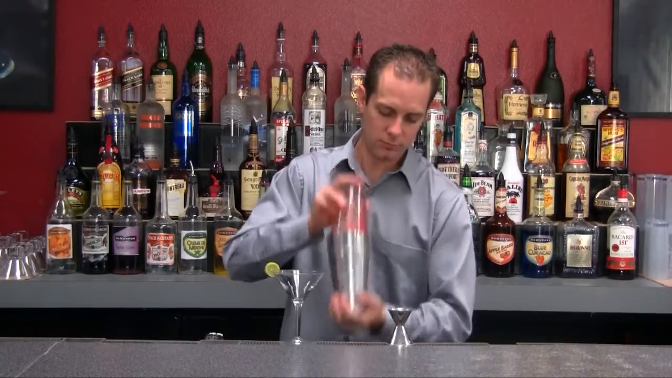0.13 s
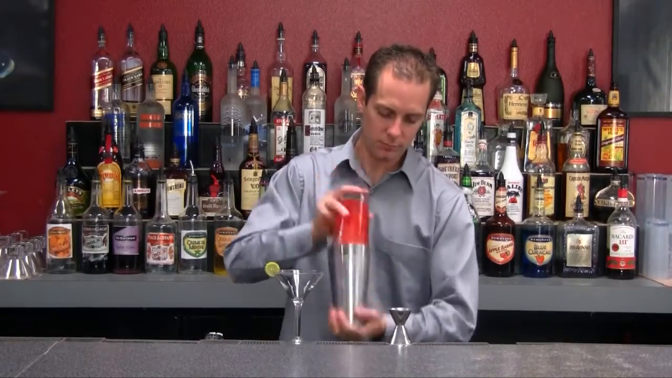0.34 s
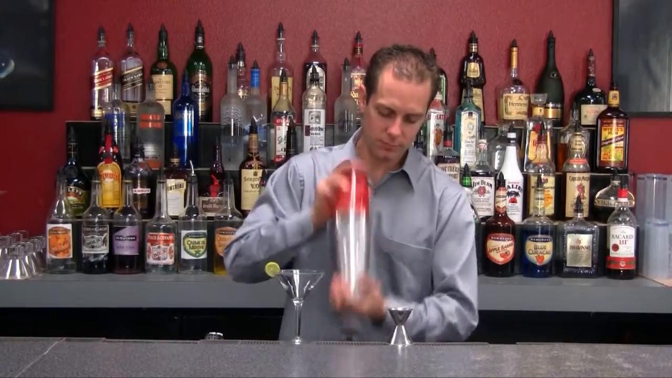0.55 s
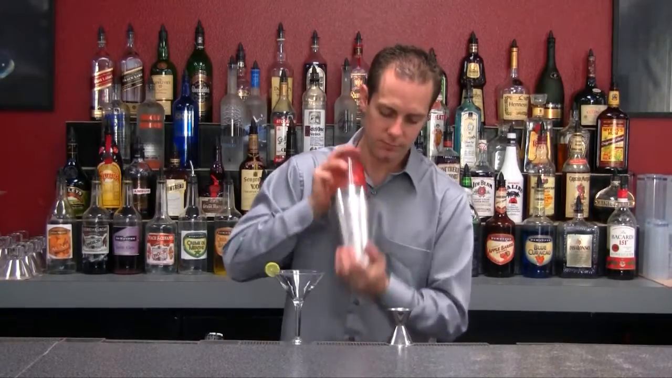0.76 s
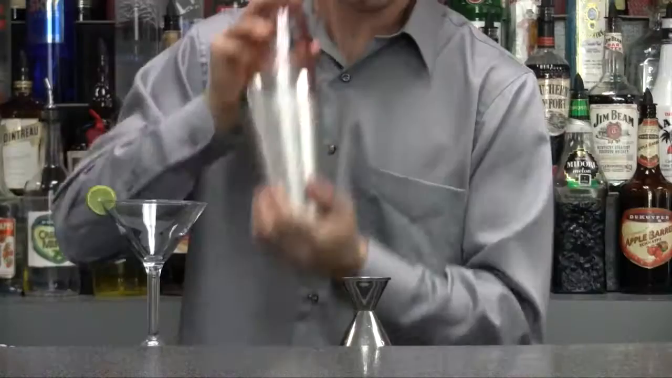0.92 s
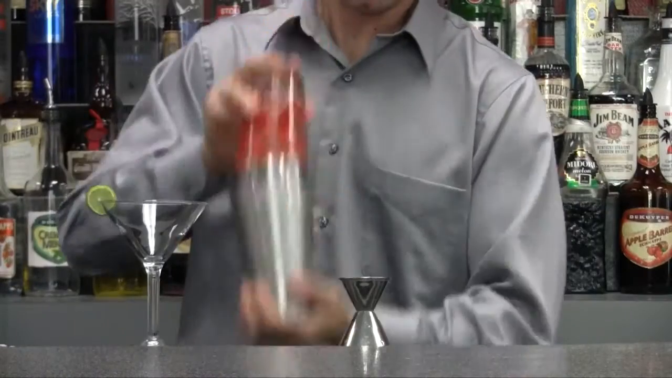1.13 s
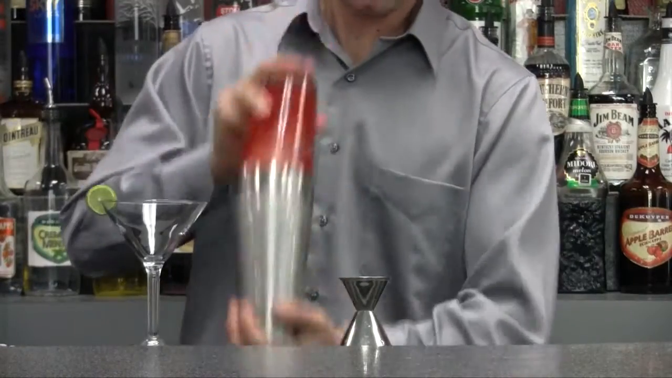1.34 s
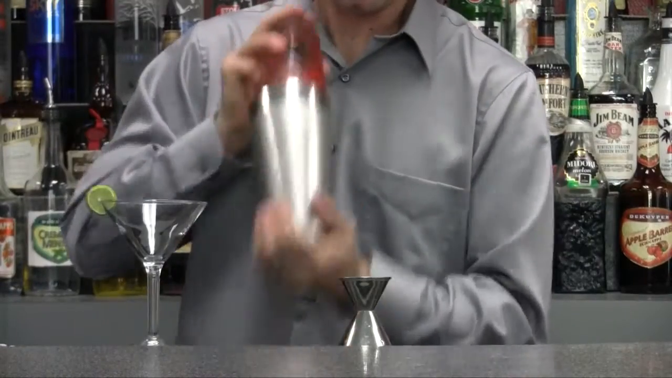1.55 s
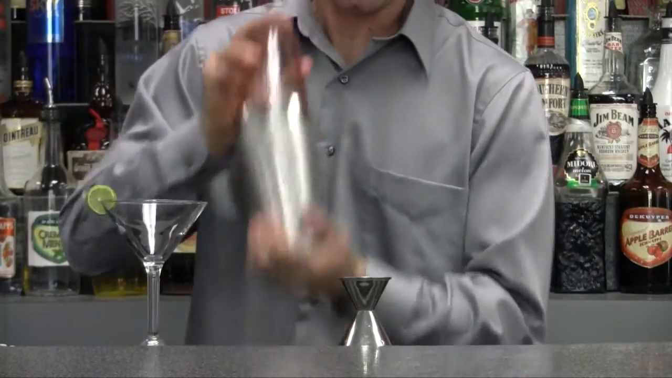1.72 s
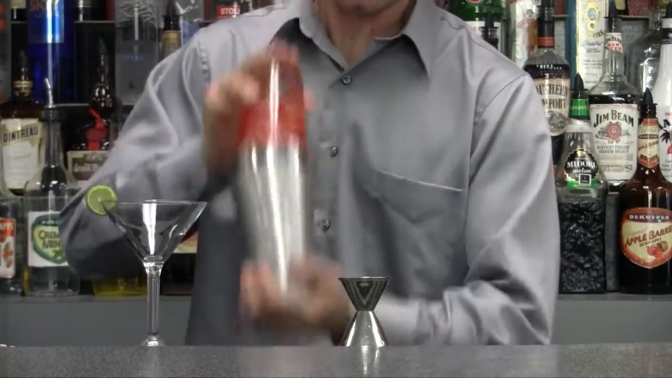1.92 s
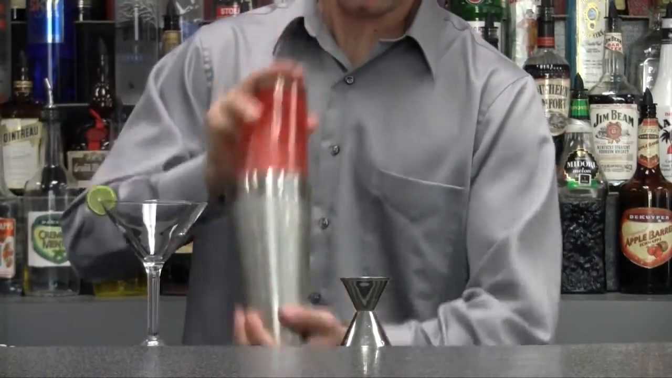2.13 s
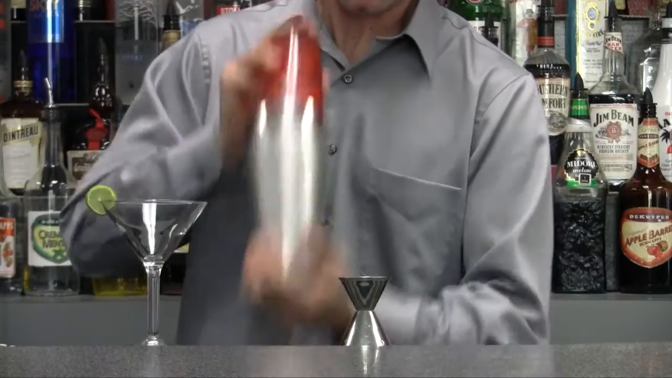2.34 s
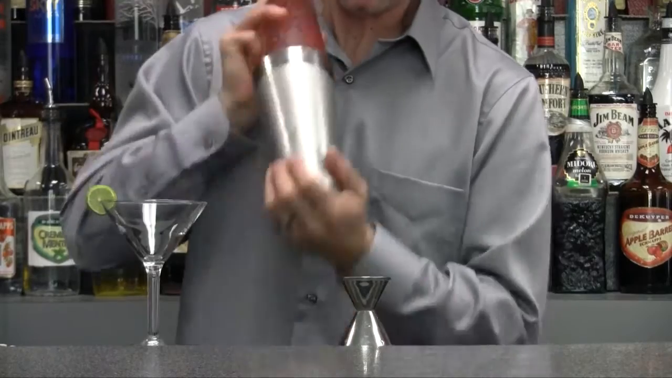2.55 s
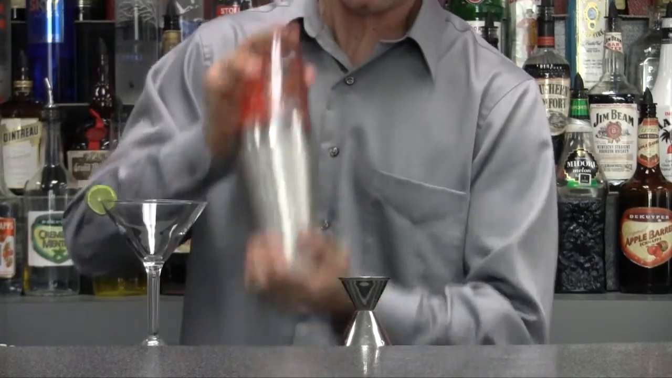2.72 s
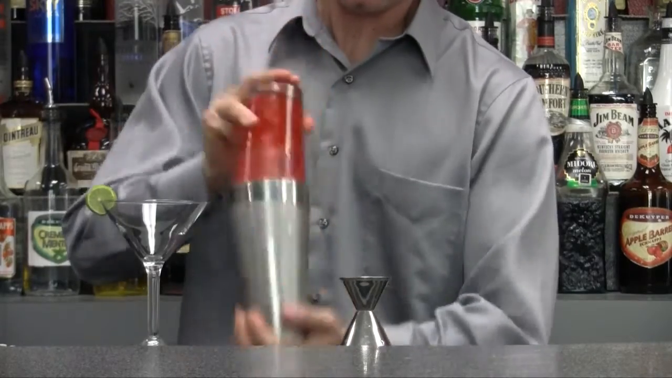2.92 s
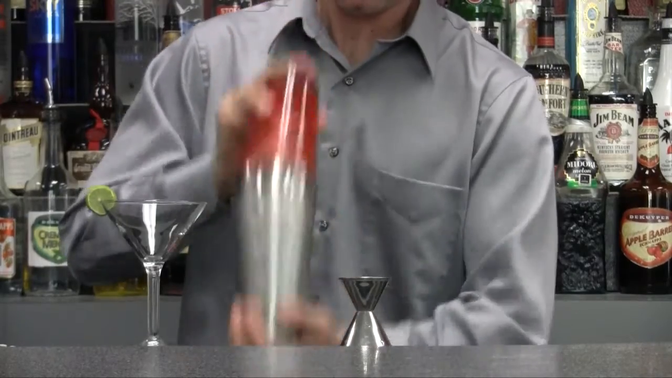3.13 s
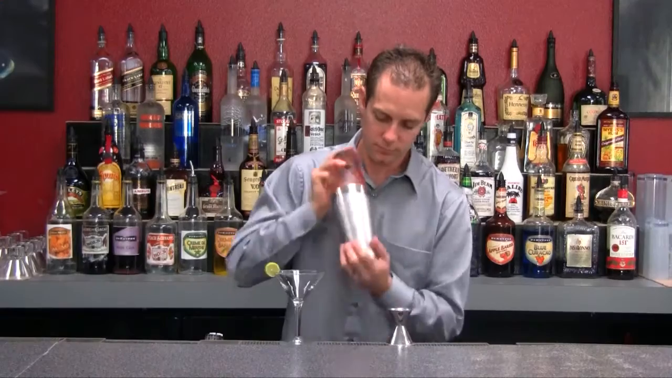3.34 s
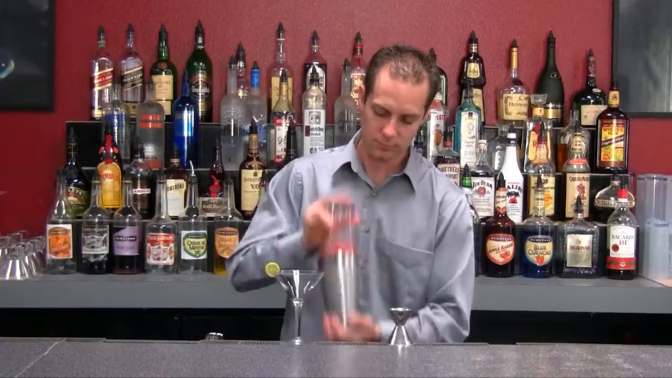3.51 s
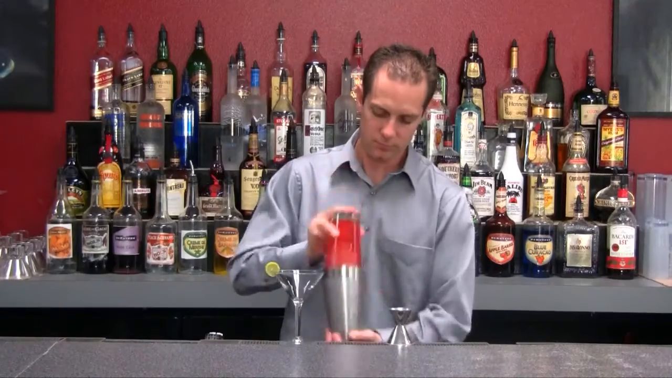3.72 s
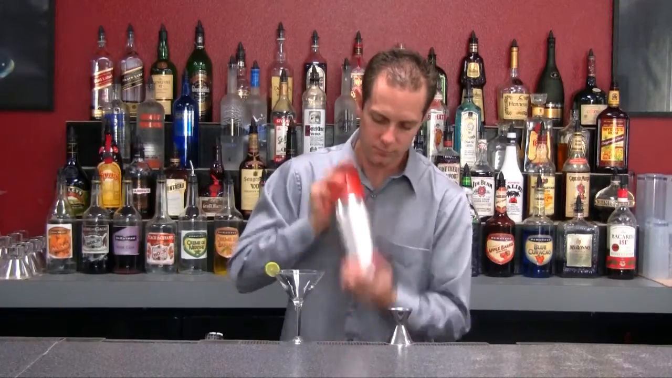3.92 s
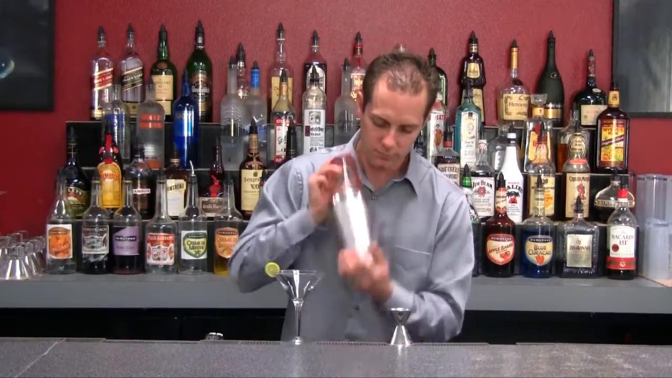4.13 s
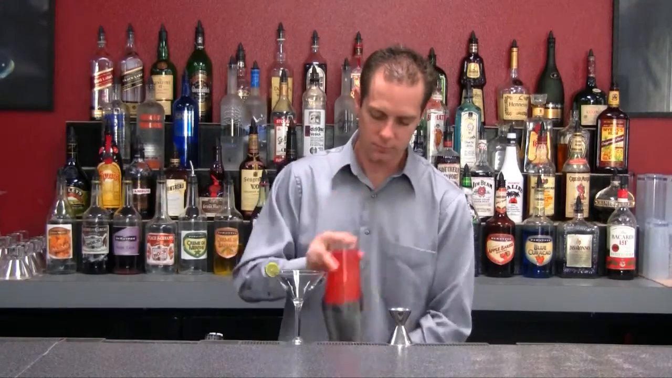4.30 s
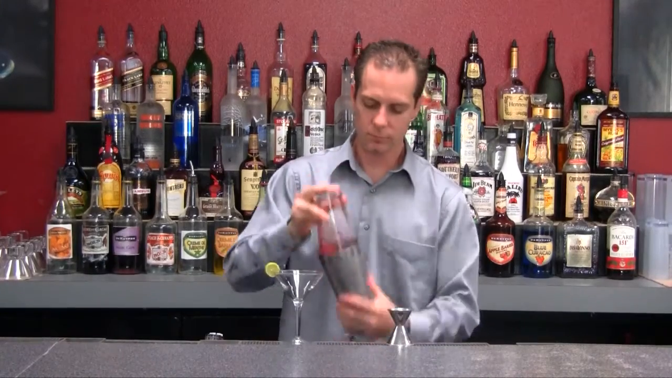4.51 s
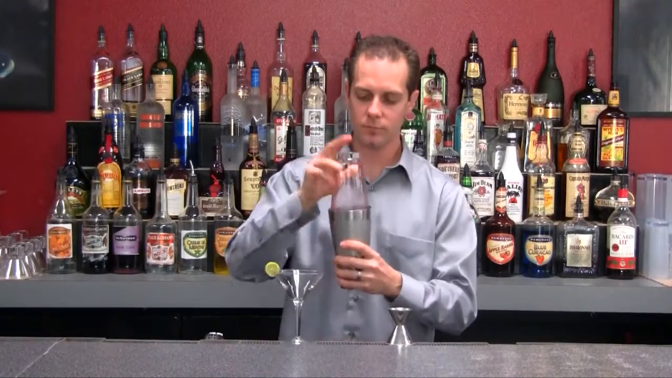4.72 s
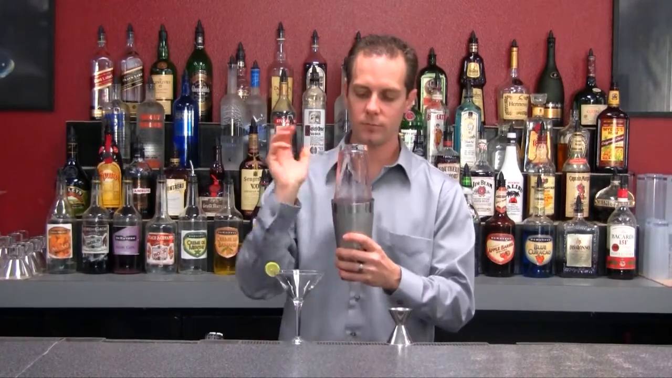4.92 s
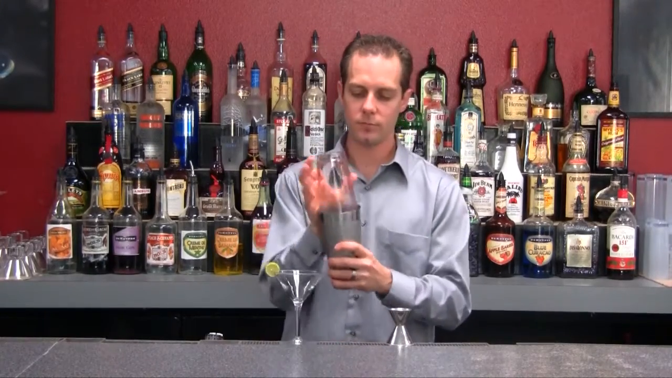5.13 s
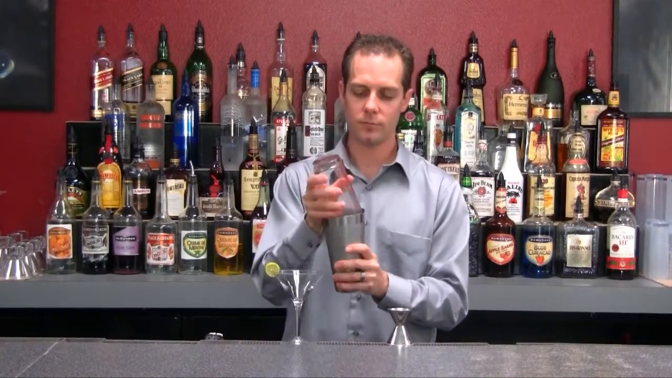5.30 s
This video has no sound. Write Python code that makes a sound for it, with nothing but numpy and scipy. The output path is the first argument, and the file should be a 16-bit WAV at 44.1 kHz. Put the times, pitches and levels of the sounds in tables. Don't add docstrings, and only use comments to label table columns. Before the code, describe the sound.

Vigorous cocktail shaking, bright clattering ice about eight strokes a second, stops abruptly; ice settles and a palm knocks the tin.

```python
import sys
import numpy as np
from scipy import signal
from scipy.io import wavfile
from scipy.ndimage import uniform_filter1d

SR = 44100
rng = np.random.default_rng(int(sys.argv[2]) if len(sys.argv) > 2 else 0)


def ratio(d):
    e = np.asarray(d, float) / 20
    return 10 ** e


def inscribe(sig):
    pcm = np.round(np.clip(np.atleast_2d(sig).T, -1, 1) * 32767)
    wavfile.write(sys.argv[1], SR, pcm.astype(np.int16))


N = 236400

# start_s [s], level_db [dB], rise_s [s], fall_s [s], glass_ring_db [dB]
DOWN = [(0.166, -18, 0.026, 0.051, -24.5), (0.421, -17, 0.035, 0.051, -17),
        (0.673, -16.5, 0.031, 0.057, -22), (0.937, -17.5, 0.0055, 0.097, -20),
        (1.189, -17.5, 0.045, 0.042, -21.5), (1.447, -19, 0.049, 0.074, -26),
        (1.737, -16, 0.031, 0.047, -20), (1.984, -16, 0.043, 0.012, -24.5), (2.239, -17, 0.031, 0.069, -20),
        (2.499, -17, 0.038, 0.05, -16.5), (2.722, -17, 0.074, 0.052, -22), (2.996, -19, 0.049, 0.094, -24),
        (3.262, -18.5, 0.035, 0.067, -23), (3.52, -17, 0.037, 0.057, -22.5),
        (3.8, -17.5, 0.029, 0.068, -30.5), (4.085, -16, 0.028, 0.035, -23.5),
        (4.375, -17.5, 0.035, 0.06, -25)]


def evened(x):
    return x / np.sqrt(np.mean(x ** 2) + 1e-20)


def read(points, hz):
    f, value = np.transpose(points)
    return np.interp(np.log(hz + 1), np.log(f + 1), value)


def add(mix, s, sound):
    part = mix[int(round(s * SR)):][:len(sound)]
    part += sound[:len(part)]


def ring(hz, cycles, rise):
    turns = np.arange(1400)[:, None] / SR * np.atleast_1d(hz)
    return (1 - np.exp(-turns / rise)) * np.exp(-turns / cycles) * np.sin(2 * np.pi * turns)


def tumbling(per_s, fall_s, share):
    starts = np.minimum(rng.exponential(1, N), 2.5) * (rng.random(N) < per_s / SR)
    keep = np.exp(-1 / (fall_s * SR))
    flurries = signal.lfilter([1], [1, -keep], starts)
    return np.sqrt(1 - share + share * flurries / flurries.mean())


def grains(modes, per_s, spread_db, cycles, detune):
    visits = [tumbling(40, 0.012, 0.4) for _ in modes]
    modes = np.tile(modes, (3, 1))
    size = ratio(spread_db * np.minimum(rng.exponential(1, N), 5)) * (rng.random(N) < per_s / SR)
    size *= rng.choice([-1, 1], N)
    patch = rng.integers(0, len(modes), N)
    pitches = modes[:, 0] * (1 + detune * rng.uniform(-1.12, 1, len(modes)))
    rings = ring(pitches, cycles, 0.35) * ratio(modes[:, 1])
    out = np.zeros(N)
    for k in range(len(modes)):
        hits = size * (patch == k) * visits[k % len(visits)]
        out += signal.oaconvolve(hits, rings[:, k])[:N]
    return evened(out)


def strikes(rows, cycles, tick_db, body_db, rebound_s, scatter, lead_db, count=16):
    out, luck = np.zeros(N), rng.random((len(rows), count, 3))
    for (s, peak_db, hz, rebound_db), (when, size, pitch) in zip(rows, luck.transpose(0, 2, 1)):
        first = ring(hz, cycles, 0.93)[:, 0]
        first = first / first.max()
        first += ratio(tick_db) * ring(hz * (1.5 + pitch[:3]), 2.8, 0.87).sum(1)
        first += ratio(body_db) * ring(hz * (0.2 + 0.4 * pitch[:2]), 0.96, 0.84).sum(1)
        add(out, s, ratio(peak_db + lead_db) * first)
        later = ring(hz * np.exp(scatter * (2 * pitch - 1)), cycles, 0.23)
        for k, turn in enumerate(3 * when):
            level = ratio(peak_db + rebound_db + lead_db / 2 - 6.1 * size[k]) * np.exp(-turn)
            add(out, s + 0.001509 + turn * rebound_s, level * later[:, k])
    return out


def hum():
    # pitch_hz [Hz], level_db [dB per Hz]
    noise_colour = [(15, -55), (25, -33.5), (80, -18), (96, -15.5), (127, -9), (161, -10), (185, -20),
                    (330, -12.5), (480, -23.5), (2100, -29), (3850, -29), (8000, -37.5), (12000, -52.5)]
    # pitch_hz [Hz], level_db [dB]
    motor_tones = [(152, -62), (240, -64), (360, -66.5)]
    frames, hz = N // 512 + 5, np.fft.rfftfreq(2048, 1 / SR)
    a, b, patches = rng.standard_normal((frames, 1025, 3)).T
    patches = evened(uniform_filter1d(uniform_filter1d(patches, 6, 0), 8, 1))
    spectrum = (a + 1j * b) * ratio(read(noise_colour, hz)[:, None] + 1.2 * patches)
    noise = signal.istft(spectrum, nperseg=2048, noverlap=1536)[1][:N]
    out = ratio(-54.5) * evened(noise)
    for f, db in motor_tones:
        out += ratio(db) * np.sin(2 * np.pi * f * np.arange(N) / SR)
    return out


def room(x, count=9):
    # pitch_hz [Hz], t60_s [s]
    die_away = [(150, 0.18), (260, 0.25), (500, 0.5), (1500, 0.21), (3500, 0.47), (7000, 0.31),
                (12000, 0.63)]
    taps = np.zeros((count, SR // 2))
    spacing = np.arange(130, SR // 2 - 20, 20)
    at = spacing + rng.integers(0, 20, (count, (SR // 2 - 131) // 20))
    np.put_along_axis(taps, at, rng.choice([-1., 1.], at.shape), 1)
    hz, t, z = signal.stft(taps, SR, nperseg=256)
    tails = signal.istft(z * ratio(-60 * t / read(die_away, hz)[:, None]), SR, nperseg=256)[1]
    tails = tails / np.linalg.norm(tails[0])
    place = (np.arange(N) / SR * 23 - np.arange(count)[:, None]) % count
    share = np.sin(np.pi * np.minimum(place, 2) / 2)
    return signal.fftconvolve(x * share, tails, axes=1)[:, :N].sum(0)


def hand():
    # start_s [s], level_db [dB], pitch_hz [Hz], t60_s [s]
    thuds = [
        (5.129, -10, 270, 0.029),
        (5.137, -27, 126, 0.05),
        (4.7, -35, 320, .05),
        (5.343, -38, 270, .06),
        (5.35, -42, 110, .05),
        (5.129, -25, 510, 0.045),
        (5.132, -23.5, 1000, 0.043),
        (6.9, -32, 670, 0.054),
        (2.27, -28, 290, .06),
        (3.82, -32, 300, 0.05),
    ]
    out, t = np.zeros(N), np.arange(6000) / SR
    for s, peak_db, hz, t60 in thuds:
        add(out, s, ratio(peak_db - 60 * t / t60) * np.sin(2 * np.pi * hz * t) * (1 - np.exp(-t / 0.002)))
    return signal.sosfilt(signal.butter(2, 45, "highpass", fs=SR, output="sos"), out)


def knock():
    # start_s [s], level_db [dB], pitch_hz [Hz], rebound_db [dB]
    hits = [
        (4.571, -20, 5600, 7.5),
        (4.678, -30, 5200, 4),
        (4.734, -37, 1710, -4),
        (4.785, -38, 2500, -8),
        (5.131, -15.5, 1550, -10),
        (5.1305, -19, 3770, 6),
        (5.133, -14, 4240, 0),
        (5.1335, -17.5, 6200, 4),
        (5.314, -37, 1300, -8),
        (5.355, -25, 3510, 11),
    ]
    return strikes(hits, 2.7, -15, -11.5, 0.0084, 0.13, -0.32)


def slaps():
    # start_s [s], level_db [dB], pitch_hz [Hz]
    slap_times = [(0.072, -23.5, 680), (0.175, -26.5, 517), (0.304, -23, 746), (0.351, -23.5, 627),
                  (0.445, -16, 975), (0.764, -24, 668), (0.915, -24, 1050), (1.088, -28, 654),
                  (1.492, -23.5, 650), (1.741, -28.5, 503), (1.878, -24.5, 686), (1.998, -27, 926),
                  (2.251, -29, 1040), (2.408, -21.5, 662), (2.646, -20.5, 740), (2.783, -28, 778),
                  (3.022, -22.5, 580), (3.262, -23.5, 553), (3.803, -31, 990), (3.962, -25, 750),
                  (4.074, -24.5, 600)]
    out = np.zeros(N)
    for s, peak_db, hz in slap_times:
        air = ring(hz, 3.9, 1.27)[:, 0] / 0.51
        gulp = ratio(-3) * ring(0.55 * hz, 2.28, 0.8)[:, 0]
        add(out, s, ratio(peak_db - 3.0) * (air + gulp))
    return out


def glass():
    late_s, swell_db_per_s, fade_db_per_s = 0.013, 119, 260
    rows = np.array(DOWN)
    since = np.arange(N) / SR - rows[:, :1] - late_s
    level_db = rows[:, -1:] + np.minimum(swell_db_per_s * since, -fade_db_per_s * since)
    singing = grains([(1530, -2), (1610, 0.67)], 1200, 1.9, 11.0, 0.028)
    return ratio(level_db.max(0) - 7.5) * tumbling(30, 0.013, 0.36) * singing


def ticks():
    # start_s [s], level_db [dB]
    tick_times = [(0.331, -3), (0.5305, -12), (0.6264, -16), (0.6893, -6), (0.708, -12), (0.8446, -13),
                  (1.1, -10.5), (1.348, -19), (1.6724, -12), (1.797, -6), (1.8754, 2.5), (1.936, -11),
                  (2.0087, -11), (2.078, -4), (2.1148, -18), (2.4238, 1), (2.449, -3.5), (2.646, 1),
                  (2.8788, -6), (3.429, -15), (3.458, 1), (3.4678, -17.5), (3.6595, -4.5), (3.964, -1),
                  (3.996, -8), (4.0214, 1.5), (4.25, -2), (4.265, 3), (4.676, -23), (4.7345, -22)]
    # pitch_hz [Hz], level_db [dB]
    tick_colour = [(1300, -2), (2500, 7.5), (4200, -4), (6300, 10), (8500, -15)]
    out, (hz, db) = np.zeros(N), np.transpose(tick_colour)
    luck = rng.uniform(-1.2, 1, (len(tick_times), 2, len(tick_colour)))
    for (s, peak_db), (pitch, level) in zip(tick_times, luck):
        click = ring(hz * (1 + 0.27 * pitch), 2.8, 0.31) @ ratio(db + 1.8 * level)
        add(out, s, ratio(peak_db) * click / abs(click).max())
    return out


def clacks():
    # start_s [s], level_db [dB], pitch_hz [Hz]
    early_cubes = [(0.0984, -15, 3010), (0.1654, -9, 4780), (0.1725, -7.5, 2760), (0.1799, -5, 4620),
                   (0.2, -3, 4850), (0.334, -11, 3140), (0.3726, 0, 5040), (0.4253, -10, 2600),
                   (0.4388, -12, 3000), (0.5308, 0, 5560), (0.583, -11, 5300), (0.5965, -5, 5600),
                   (0.603, -2, 5700), (0.6276, -11, 3300), (0.672, -8.5, 5860), (0.6762, -3, 5990),
                   (0.6891, -5, 2740), (0.6973, 2, 2920), (0.7082, -5, 2890), (0.822, -21, 3010),
                   (0.8469, -6.5, 3020), (0.8744, -5, 5500), (0.9007, -14, 5340), (0.9122, -6.5, 1580),
                   (0.9434, -1.5, 2790), (0.9509, -5.5, 2170), (0.9817, -7.5, 4610), (1.0366, -12, 5340),
                   (1.0451, -14.5, 3790), (1.0554, -9, 4520), (1.0959, -12, 5900), (1.1023, -6, 5800),
                   (1.1891, -11.5, 3080), (1.1971, -9.5, 1500), (1.2082, -9.5, 2450), (1.2174, -7.5, 2730),
                   (1.2378, -11, 1610), (1.3004, -7, 4570), (1.3503, -2.5, 5860), (1.4521, -12.5, 1610),
                   (1.4564, -3, 5640), (1.461, -5, 3940), (1.4921, 0, 2710), (1.6493, -20, 2600),
                   (1.662, -11, 2970), (1.6732, -9, 3100), (1.6826, -9, 3180), (1.7541, -5.5, 1590),
                   (1.7583, -15, 1790), (1.7943, -17, 1600), (1.909, -11, 3020), (1.9341, -1.5, 5680),
                   (2.0102, -5.5, 2800), (2.054, -5, 3730), (2.1629, -12, 4690)]
    # start_s [s], level_db [dB], pitch_hz [Hz]
    late_cubes = [(2.1769, -16, 3300), (2.1873, -10, 2950), (2.2473, -13, 1600), (2.2832, -6, 1720),
                  (2.2885, -18.5, 1790), (2.4077, -10.5, 2320), (2.4243, -11, 4910), (2.4496, -4, 4660),
                  (2.4745, -13, 1590), (2.525, 4, 2660), (2.5426, -11.5, 2560), (2.5832, -15, 2580),
                  (2.6154, -8, 5680), (2.707, -16, 1640), (2.7253, 0, 2650), (2.7321, -12, 2000),
                  (2.7433, -8, 2310), (2.7633, -6, 1650), (2.7744, -4.5, 2510), (2.9604, -12, 3080),
                  (2.9985, -15, 1660), (3.0343, -11, 4310), (3.0385, -5, 4570), (3.0891, -15, 2150),
                  (3.1367, -15, 4180), (3.1518, -9, 4050), (3.1783, -11, 4670), (3.2652, -8, 2460),
                  (3.2739, 2.5, 2450), (3.2842, -11, 2430), (3.2904, 0, 2560), (3.4311, -15, 3900),
                  (3.4682, -14, 5120), (3.4823, -14.5, 1700), (3.6594, -14, 4560), (3.7319, -9, 2920),
                  (3.742, -10, 1660), (3.808, -23, 1640), (3.8205, -3, 2430), (3.836, -13, 2560),
                  (3.8505, -16, 2710), (3.8676, -9, 2470), (3.9292, -10, 4350), (4.0227, -18, 2700),
                  (4.0989, -9.5, 2650), (4.1134, -11, 1770), (4.3961, -9, 5210), (4.4567, -10, 4440),
                  (4.4685, -12, 3700)]
    # start_s [s],
    # level_db [dB], pitch_hz [Hz]
    more_cubes = [(0.1759, -11, 1460), (0.1816, -11.5, 1730), (0.429, -6, 2760), (0.4479, -16, 1810),
                  (0.7197, -6.5, 4350), (0.8496, -17, 1590), (0.9863, -7, 3900), (1.0007, -10, 4390),
                  (1.225, -11, 1630), (1.2337, -16.5, 3030), (1.4079, -5, 3170), (1.4483, -12, 4650),
                  (1.4777, -14, 1485), (1.5043, -16, 1770), (1.7467, -11, 4340), (1.7519, -4, 4430),
                  (2.2812, -6, 2850), (2.6975, -7, 5860), (2.7728, -4, 3950), (2.7863, -4, 2700),
                  (2.9334, -11, 3140), (3.0122, -13, 5620), (3.0173, -14, 3920), (3.1721, -8, 5770),
                  (3.1883, -12, 4480), (3.2578, -13, 3700), (3.2707, -7, 1650), (3.3386, -10, 2410),
                  (3.5477, -20.5, 1440), (3.8297, -12, 2670), (3.8407, -7, 5120), (3.8807, -13, 2430),
                  (3.9981, -8, 6370), (4.1057, -11, 4130), (4.2688, -13, 4040), (4.4176, -10, 2500),
                  (4.453, -17, 1940), (4.5755, -23, 3300), (5.157, -32, 1550), (5.171, -28, 1510),
                  (5.214, -30, 1600)]
    out = np.zeros(N)
    for s, peak_db, hz in list(early_cubes) + list(late_cubes) + list(more_cubes):
        clack = ring(hz, 3.2, 0.78)[:, 0] / 0.56
        clack += ratio(-5) * ring([3900, 5600], 2.2, 0.27).sum(1) * (hz < 3500)
        jolt = ratio(-24) * ring(0.42 * hz, 1.2, 0.76)[:, 0]
        add(out, s, ratio(peak_db) * (clack + jolt))
    return out


def light_cubes():
    # start_s [s], level_db [dB], pitch_hz [Hz], rebound_db [dB]
    clicks = [(.181, 0.5, 4580, -22), (.1998, 4, 4230, -18), (.3047, -8, 6100, -1), (.371, -6, 4970, 1),
              (.4247, 3, 4700, -8), (.5307, -1, 5600, -3), (.6766, -4, 4900, -15),
              (.9522, -6.5, 4140, 10.5), (1.102, -1, 5800, -16), (1.2175, 1.5, 5500, -7),
              (1.4765, -3, 5700, -8), (1.4908, -9.5, 4340, 12.5), (1.877, -5, 4320, -9),
              (2.0537, 1.5, 4320, -0.5), (2.139, 0, 5800, -1.5), (2.2772, 2.5, 4300, -15),
              (2.3993, -1.5, 4800, -5), (2.614, -0.5, 5800, -13), (2.6932, -3.5, 4900, 3),
              (2.9992, -3, 5600, 8), (3.0332, 0, 4600, -3), (3.1739, 1, 4650, -10), (3.43, -7, 4070, 8.5),
              (3.5513, -9, 4030, 4), (3.659, -10, 5800, -4), (3.827, 2, 5230, 1), (3.8616, 0.5, 4210, -4),
              (4.2505, -3.5, 4460, -11), (4.378, -5, 4370, 5), (4.4, -8.5, 4610, 11.5)]
    return strikes(clicks, 13.2, -19.0, -3, 0.028, 0.16, -2.7)


def heavy_cubes():
    # start_s [s], level_db [dB], pitch_hz [Hz], rebound_db [dB]
    base_hits = [(.159, -2, 2200, -7), (.175, -5, 2740, 9), (.425, 0, 2660, -29), (.438, -6.5, 2950, 8),
                 (.594, -6, 2700, -5), (.6968, 1, 2880, -17), (.819, -10, 3300, 2),
                 (.9435, -13, 2850, -16.5), (1.112, -10, 3000, 3), (1.2148, -1.5, 2620, -20),
                 (1.4265, -7, 3100, -13), (1.492, 7.5, 2700, -5.5), (1.6715, -31, 2970, 1),
                 (1.908, -10, 2970, -4), (2.188, -19.5, 3000, -9), (2.4039, -16, 2230, -4),
                 (2.5237, -13, 2660, -10), (2.6464, -28.5, 3120, 2), (2.7239, -4, 2470, 4.5),
                 (2.7743, -8, 2650, -18), (2.9085, -14, 3020, -17), (3.0326, -4.5, 2370, 3.5),
                 (3.1716, -19, 2880, -11), (3.2635, 1, 2486, 0), (3.523, -4, 2310, 7),
                 (3.705, -2.5, 2380, -19), (3.8272, -1, 2600, 2.5), (4.0228, -4.5, 2660, -15),
                 (4.286, -8.5, 2500, 0), (4.4021, -13.5, 2350, 10)]
    # start_s [s], level_db [dB], pitch_hz [Hz], rebound_db [dB]
    rim_hits = [(0.18, -10.5, 1440, 7), (0.678, -7, 1580, -6), (.846, -15, 1570, 5.5),
                (0.9115, -9, 1605, -20), (0.958, -3.5, 1224, -10.5), (1.194, -2, 1690, -17),
                (1.4458, -9.5, 1570, -13), (1.477, -15, 1570, 0.5), (1.7444, -13, 1590, -10),
                (1.9736, -10, 1560, -9.5), (1.995, -7.5, 1550, 4), (2.0072, -7, 1780, -7),
                (2.244, -6.5, 1610, -7), (2.2554, -0.5, 1540, -24), (2.4992, -1.5, 1490, -5),
                (2.763, -6, 1550, -23), (2.9985, -13.5, 1700, -19), (3.018, -8, 1610, 3),
                (3.252, -16, 1660, 2), (3.54, -5, 1490, 1), (3.7402, -10, 1640, -24),
                (3.803, -4.5, 1607, -0.5), (4.044, -8, 1500, -12), (4.093, -7, 1454, 1.5),
                (4.336, -9, 1660, -13), (4.379, -14.5, 1465, 0)]
    return strikes(list(base_hits) + list(rim_hits), 7.5, -1.5, -18.5, 0.022, 0.135, -5.0)


def rattle():
    # start_s [s], level_db [dB], rise_s [s], fall_s [s]
    up = [(0, -21, 0.0019, 0.18), (.07, -22.5, 0.0077, 0.07), (.3, -20.5, 0.0074, 0.064),
          (.33, -18.5, 0.026, 0.043), (.53, -21, 0.017, 0.23), (.591, -22.5, .006, 0.04),
          (.818, -18, 0.024, 0.026), (.872, -21, .0049, 0.13), (1.086, -18, 0.019, 0.082),
          (1.297, -24.5, .007, 0.094), (1.332, -18, 0.037, 0.059), (1.371, -20.5, 0.027, 0.029),
          (1.599, -19, 0.058, 0.051), (1.873, -17.5, 0.007, 0.042), (1.901, -18, 0.0076, 0.035),
          (2.049, -20, .0039, 0.11), (2.131, -20, 0.051, 0.032), (2.399, -18, 0.024, 0.043),
          (2.471, -22.5, .0072, 0.033), (2.611, -20.5, 0.014, 0.042), (2.638, -19.5, 0.052, 0.013),
          (2.875, -17.5, 0.0069, 0.027), (2.904, -17.5, 0.012, 0.045), (3.162, -17.5, 0.031, 0.028),
          (3.399, -25, .005, .03), (3.415, -18, 0.017, 0.048), (3.455, -24.5, 0.0088, 0.036),
          (3.658, -19, .002, .01), (3.686, -22, 0.014, 0.1), (3.733, -16, 0.013, 0.01),
          (3.954, -20, 0.016, 0.094), (4.225, -20.5, 0.083, 0.045)]
    # start_s [s], level_db [dB], rise_s [s], fall_s [s]
    settle = [
        (4.569, -28.5, 0.0052, 0.0072),
        (4.663, -44.5, 0.023, 0.039),
        (4.731, -50, .0093, .027),
        (4.772, -51, 0.01, 0.045),
        (5.1255, -30.5, 0.0073, 0.03),
        (5.19, -44.5, 0.0072, 0.083),
        (5.327, -46, .016, 0.052),
        (5.354, -38, .0055, .02),
    ]
    # pitch_hz [Hz], level_db [dB]
    wall_rings = [(3100, -4.5), (3600, -5), (4200, -2.5), (4800, -3), (5600, -1), (6500, -2)]
    # pitch_hz [Hz], level_db [dB]
    base_rings = [(1220, -10), (1560, -1.5), (1850, -2), (2350, 0.5), (2720, 2)]
    # pitch_hz [Hz], level_db [dB]
    slosh_rings = [(150, -42.5), (280, -9), (400, -10.5), (510, 2.5), (660, 8), (830, 5), (1010, 8.5)]
    # pitch_hz [Hz], level_db [dB]
    spray_rings = [(7400, 1), (8400, 1.5), (9500, -0.5), (10600, -35), (11700, -6)]
    power, t = np.zeros((3, N)), np.arange(SR // 2) / SR
    for throws, base_db, slosh_db in ((DOWN, 0.54, -12), (up, -3.5, -14.5), (settle, -1, -12)):
        for s, peak_db, rise, fall, *_ in throws:
            rise, fall = max(rise, 0.002), max(fall, 0.005)
            landing = 1.22 * np.exp(-rise / 0.062)
            growth = landing + (1 - landing) * t / rise
            swell = np.where(t < rise, growth, np.exp(-(t - rise) / fall))
            swell = swell * (1 - (s > 0.01) * np.exp(-t / 0.003))
            for layer, db in zip(power, (0, base_db, slosh_db)):
                add(layer, s, (ratio(peak_db + db) * swell) ** 2)
    wall = ratio(-1.0) * grains(wall_rings, 4000, 2.0, 2.37, 0.091)
    base = ratio(-2.5) * grains(base_rings, 1500, 1.44, 2.97, 0.07)
    slosh = ratio(-1.0) * grains(slosh_rings, 1100, 0.98, 1.57, 0.023)
    spray = ratio(-13.5) * grains([(6800, 2.0)] + list(spray_rings), 8000, 2.5, 3.3, 0.03)
    clumps = tumbling(150, 0.0028, 0.35)
    body = (np.sqrt(power) * [wall * clumps, base * clumps, slosh]).sum(0)
    return body + (power[0] * clumps) ** 0.46 * spray


def scene():
    shaker = rattle() + glass() + slaps() + knock()
    shaker += ratio(-3.0) * heavy_cubes() + ratio(-8.5) * light_cubes()
    shaker += ratio(-9.5) * ticks() + ratio(-2.0) * clacks()
    shaker = signal.sosfilt(signal.butter(4, 150, "highpass", fs=SR, output="sos"), shaker)
    push = hand()
    echoes = room(ratio(-4.5) * shaker + ratio(-6.0) * push)
    return (shaker + push + echoes + hum())[None]


def low_pass(x):
    return signal.sosfilt(signal.butter(12, 12770, fs=SR, output="sos"), x)


def record(dry):
    limited = dry / (1 + dry ** 4) ** (1 / 4)
    lowpass = signal.firwin(301, 11840, window=("kaiser", 7), fs=SR)
    finished = 0.93 * signal.oaconvolve(limited, lowpass[None], "same")
    return low_pass(finished)


dry = scene()
out = record(dry)
inscribe(out)
```